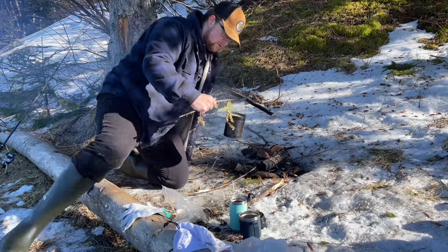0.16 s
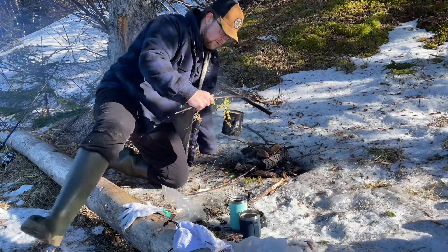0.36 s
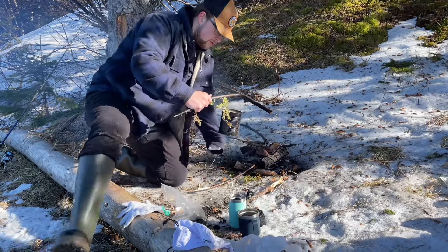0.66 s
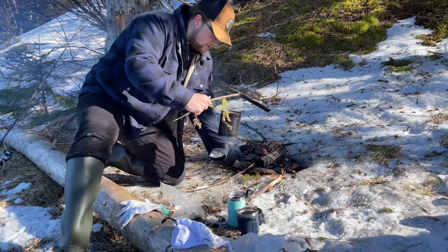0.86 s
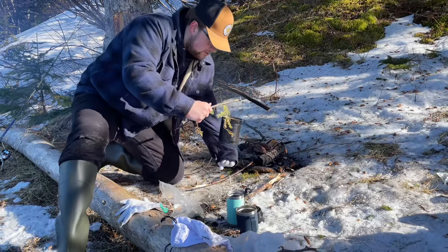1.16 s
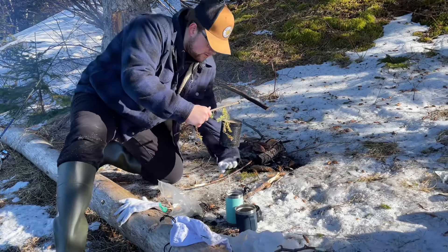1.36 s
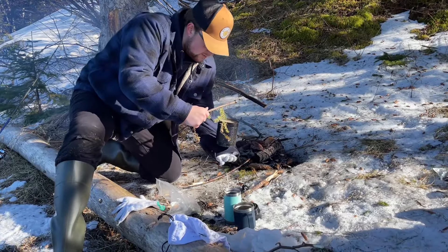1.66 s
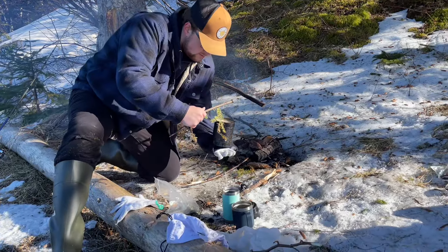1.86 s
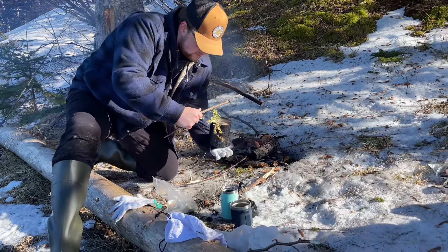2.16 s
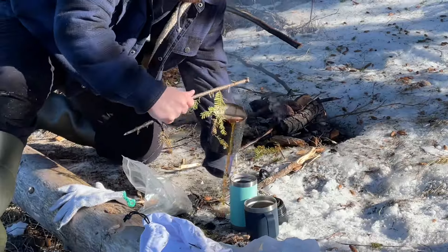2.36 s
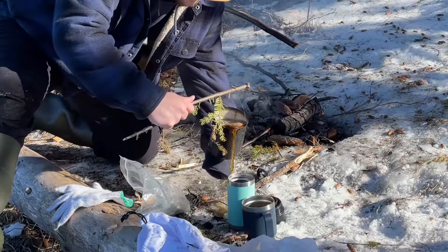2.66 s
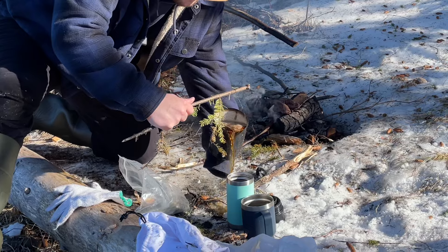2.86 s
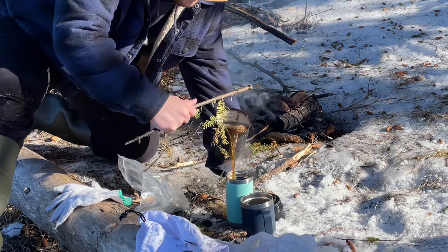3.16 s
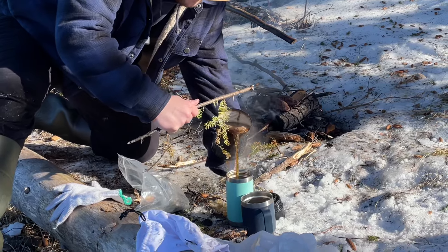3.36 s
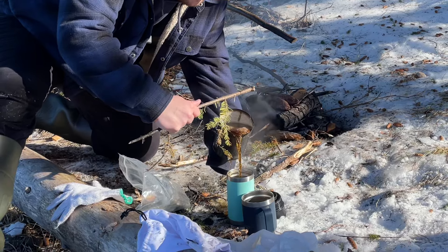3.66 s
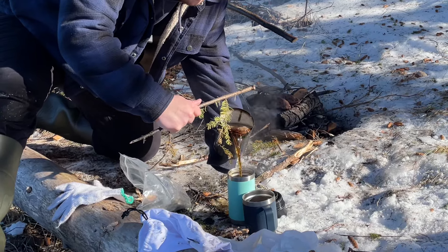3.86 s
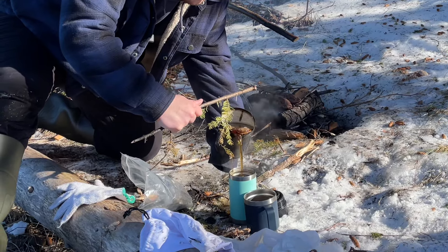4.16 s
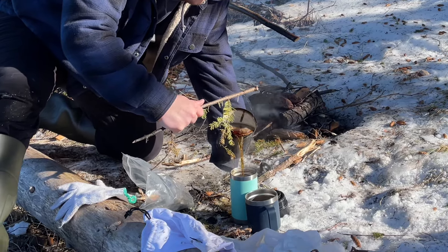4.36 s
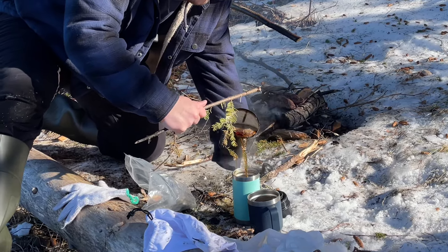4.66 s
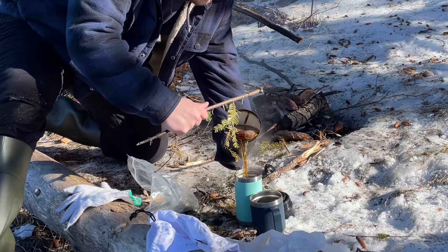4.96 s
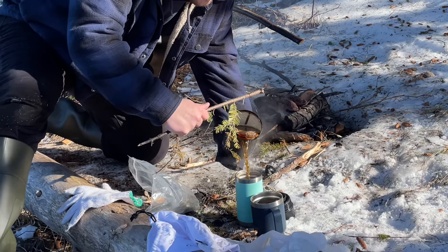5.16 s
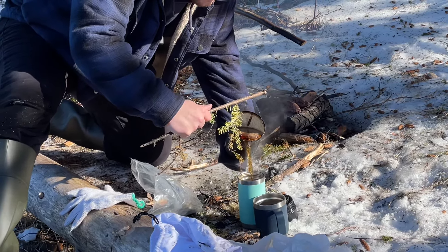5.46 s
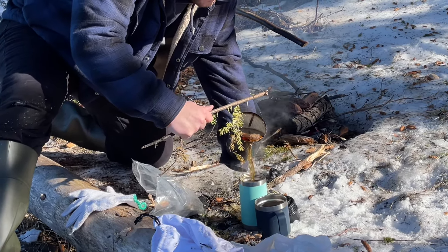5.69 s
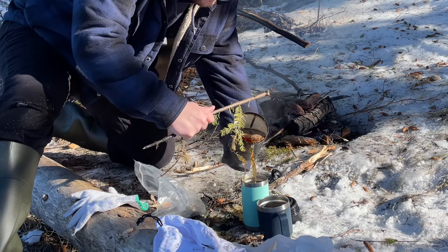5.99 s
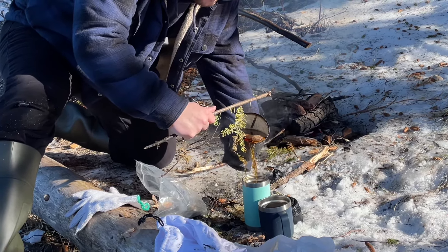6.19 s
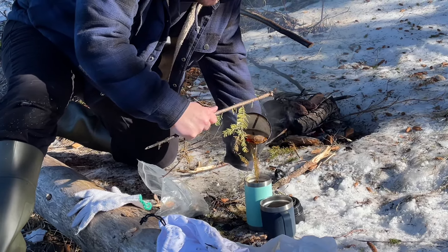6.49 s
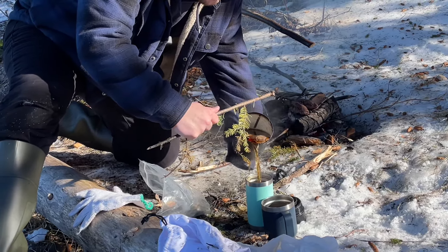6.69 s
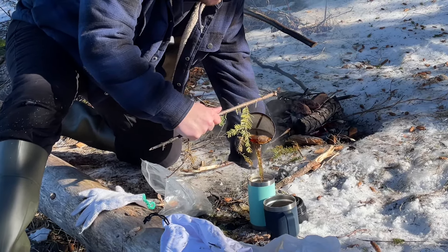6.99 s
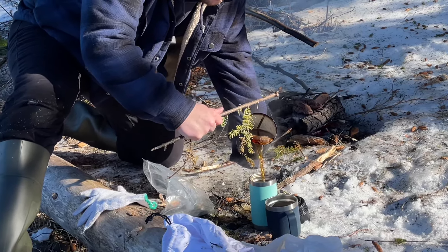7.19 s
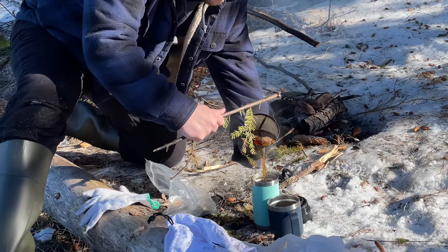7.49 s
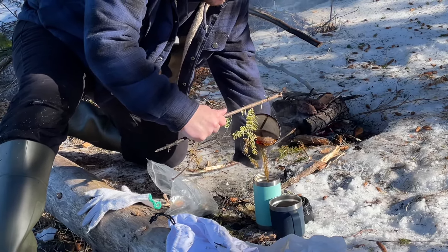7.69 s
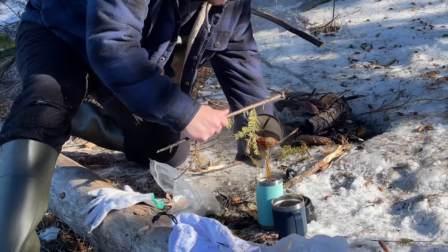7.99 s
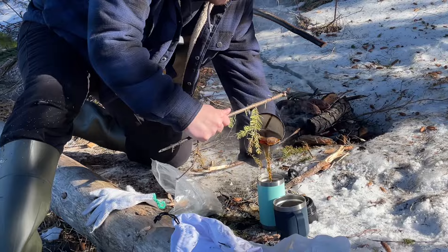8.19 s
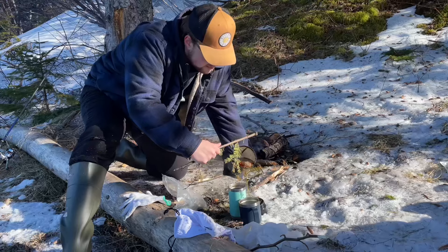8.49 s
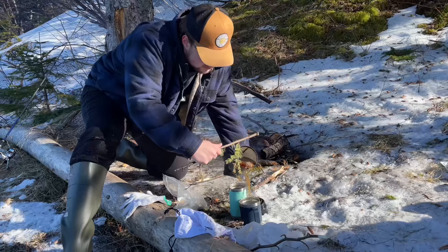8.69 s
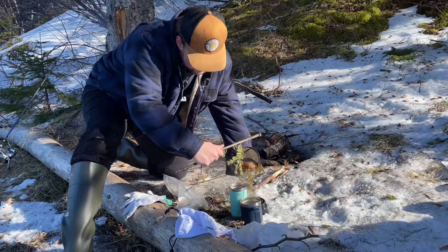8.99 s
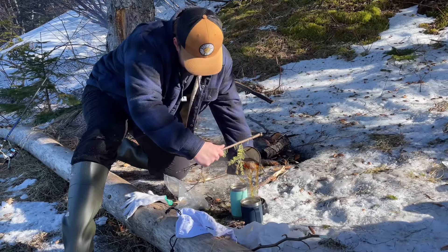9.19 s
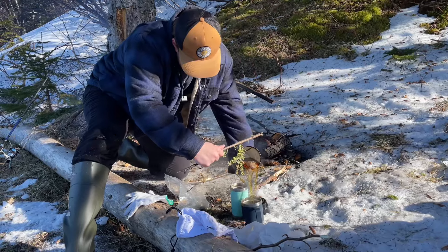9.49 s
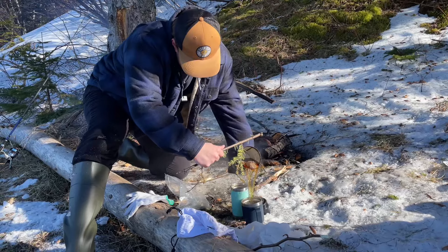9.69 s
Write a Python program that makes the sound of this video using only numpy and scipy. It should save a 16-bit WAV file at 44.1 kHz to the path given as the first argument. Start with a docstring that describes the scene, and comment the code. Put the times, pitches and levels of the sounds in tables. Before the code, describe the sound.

Boots thump and clothing rustles, embers pop sharply, then a thin stream of tea gurgles into a steel mug outdoors, pausing before resuming.

```python
"""In a snowy wood, beside a dying campfire, tea trickles from a can into a steel mug.
Behind it lie a far rumble and a thin hiss of filtered noise, and a frequency-modulated drone.
A kneeling man shifts his boots (noise bursts and decaying thumps); embers pop (band-passed pushes).
The first tea rings the mug's modes, then the stream plops in its air column, a resonator whose
note rises through the first pour. Near the end a second pour begins, its note sinking slightly."""
import sys
import numpy as np
from scipy import signal
from scipy.fft import rfft, irfft, next_fast_len
from scipy.io import wavfile
from scipy.ndimage import map_coordinates

SR = 44100
rng = np.random.default_rng(int(sys.argv[2]) if len(sys.argv) > 2 else 0)


def to_wav(s):
    """Save 16-bit WAV."""
    ch = np.atleast_2d(s).T  # columns
    pcm = np.round(np.clip(ch, -1, 1) * 32767)  # PCM
    wavfile.write(sys.argv[1], SR, pcm.astype(np.int16))


N = 433944


def amp(db):
    """Decibel scale: a level becomes an amplitude gain."""
    return 10 ** (np.asarray(db) / 20)


def unit(x):
    """Normalisation: x is scaled to an rms value of 1."""
    return x / np.sqrt(np.mean(x ** 2) + 1e-20)


def fade(t, t60):
    """Exponential decay: the amplitude falls by 60 dB in t60 seconds."""
    return np.exp(-np.log(1000) * t / t60)


def swell(s, width):
    """Gaussian envelope: height 1 at time s, 1/e at a distance of width seconds."""
    return np.exp(-((np.arange(N) / SR - s) / width) ** 2)


def along(points, hz):
    """Interpolation of (Hz, value) points on a logarithmic frequency axis."""
    f, v = np.transpose(points)
    return np.interp(np.log(hz + 1), np.log(f + 1), v)


def curves(rows):
    """Linear interpolation in time: one value per sample for each column after the time."""
    s, *cols = np.transpose(rows)
    return [np.interp(np.arange(N) / SR, s, c) for c in cols]


def held(rows):
    """Step function: one value per sample for each column, from the row that began last."""
    rows = np.array(rows)
    return rows[np.searchsorted(rows[1:, 0], np.arange(N) / SR)].T


def wobble(rate):
    """Slow random modulation: a spline through random knots, rate of them a second."""
    knots = rng.standard_normal(int(N * rate / SR) + 4)
    return map_coordinates(knots, [np.arange(N) * rate / SR])


def filtered(x, response):
    """Linear filtering: the spectrum of x is multiplied by a frequency response."""
    m = next_fast_len(N + SR // 2)
    return irfft(rfft(x, m) * response(np.fft.rfftfreq(m, 1 / SR)), m)[..., :N]


def coloured(x, spectrum):
    """Spectral shaping: x is given a (Hz, dB) weighting and an rms value of 1."""
    return unit(filtered(x, lambda hz: amp(along(spectrum, hz))))


def band(x, lo_hz, hi_hz, order=2):
    """Causal Butterworth band-pass filtering."""
    edges_hz = [lo_hz, min(hi_hz, SR / 2 - 1)]
    return signal.sosfilt(signal.butter(order, edges_hz, "band", fs=SR, output="sos"), x)


def add(track, s, x):
    """Superposition: x is summed into the track from time s."""
    part = track[max(round(s * SR), 0):][:len(x)]
    part += x[:len(part)]


def stereo_noise(side_db):
    """Partial coherence: two noises share a mid part and differ by a side part."""
    mid, side = rng.standard_normal((2, N))
    return np.array([mid + amp(side_db) * side, mid - amp(side_db) * side])


def ticks(rate, scatter_db):
    """Random impulse train: rate impulses a second, their sizes spread over scatter_db."""
    draws = rng.random((int(rate * N / SR), 2))
    return np.bincount((draws[:, 0] * N).astype(int), amp(-scatter_db * draws[:, 1]), N)


def bursts(blows, t60):
    """Envelope modulation: each blow becomes a decaying puff of noise."""
    envelope = signal.lfilter([1], [1, -fade(1 / SR, t60)], blows)
    return unit(envelope * rng.standard_normal(N))


def resonator(x, hz, t60):
    """Resonance: x rings one damped mode, whose frequency may move."""
    turn = np.exp(2j * np.pi * np.cumsum(hz * np.ones(N)) / SR)
    ringing = turn * signal.lfilter([1], [1, -fade(1 / SR, t60)], x / turn)
    return unit(ringing.imag)


def bubble(hz, t60, rise, attack):
    """Bubble resonance: a pocket of air rings, its pitch climbing as it nears the surface."""
    t = np.arange(SR // 16) / SR
    return np.sin(2 * np.pi * hz * t * (1 + rise * t)) * fade(t, t60) * (1 - np.exp(-t / attack))


def bubbles(blows, pitch, spread, t60, rise):
    """Bubble population: each blow rings near a pitch curve, with its own life and chirp."""
    out = np.zeros(N)
    at = np.flatnonzero(blows)
    draws = np.clip(rng.standard_normal((len(at), 4)), -2, 2)
    for i, (detune, sign, life, climb) in zip(at, draws):
        hz = pitch[i] * np.exp(spread * detune)
        ring = bubble(hz, t60 * np.exp(0.58 * life), rise * np.exp(0.9 * climb), attack=0.00047)
        add(out, i / SR, np.sign(sign) * blows[i] * ring)
    return unit(out)


# The background in three stretches. Each row: start in seconds, hiss level in dB before a 9.5 dB lift,
# echo of pops, thumps and knocks in dB.
BACKGROUND = [(0, -75, -10), (2.321, -73.5, -19.5), (8.394, -69.5, -14)]
# Spectrum of the far rumble. Each row: frequency in Hz, relative level in dB.
RUMBLE_SPECTRUM = [(20, -49), (45, -1.5), (72, 4), (150, -2), (215, -6), (310, -17), (700, -19.5),
                   (1500, -31), (4000, -46)]
# Spectrum of the thin hiss. Each row: frequency in Hz, relative level in dB.
HISS_SPECTRUM = [(300, 6), (1500, 1.5), (4000, 3), (7000, 0.5), (12000, -2), (16000, 1.5)]
# Glide of the far drone. Each row: time in seconds, mean pitch in Hz.
DRONE = [(2.3, 107), (2.5, 140.3), (3.8, 154.2), (4.95, 160.6), (5.4, 120), (9.84, 122)]
RUMBLE_DB = -57
DRONE_DB, DRONE_IDLE_HZ, DRONE_DB_PER_OCT = -63.5, 120, 6.5  # it grows louder as it rises


def air():
    """Filtered noise and frequency modulation: a far rumble, a wavering drone and a thin hiss."""
    _, hiss_db, _ = held(BACKGROUND)
    drone_hz, = curves(DRONE)
    drone_db = DRONE_DB + DRONE_DB_PER_OCT * np.log2(drone_hz / DRONE_IDLE_HZ)
    rumble = coloured(stereo_noise(side_db=-7.5), RUMBLE_SPECTRUM) * amp(1.3 * wobble(12))
    phase = 2 * np.pi * np.cumsum(drone_hz + 1.6 * wobble(20)) / SR
    drone = unit(np.sin(phase) * amp(1.5 * wobble(8.7)))
    hiss = coloured(stereo_noise(side_db=0.0), HISS_SPECTRUM) * amp(0.7 * wobble(5))
    return amp(RUMBLE_DB) * rumble + amp(drone_db) * drone + amp(hiss_db + 9.5) * hiss


# Echo among the trees. Each row: frequency in Hz, 60 dB decay time in seconds.
WOOD_DECAY = [(200, 0.18), (2000, 0.15), (6000, 0.15), (14000, 0.15)]


def trees(x):
    """Diffuse scattering: trunks return a late, decaying noise tail, different on each side."""
    hz, t, z = signal.stft(rng.standard_normal((2, SR // 3)), SR, nperseg=256)
    decay = fade(t, along(WOOD_DECAY, hz)[:, None])
    tail = signal.istft(z * decay, SR, nperseg=256)[1]
    late = np.pad(x, (round(.011 * SR), 0))  # 11 ms on the way
    return signal.fftconvolve(late[None], tail / np.linalg.norm(tail[0]), axes=1)[:, :N]


# Swells of rustling; the one at 3.2 s is the wash after a loud pop. Each row: middle in seconds, half
# width in seconds, cloth level in dB before a 3.5 dB lift, snow level in dB before a 4 dB lift.
RUSTLES = [(0.17, 0.053, -59, -61), (0.73, 0.049, -64, -70), (1.0, 0.26, -59.5, -74),
           (1.401, 0.23, -64, -63.5), (2.205, 0.019, -75, -64), (2.4, 0.089, -68, -65),
           (2.8, 0.45, -71, -64), (3.2, 0.13, -63, -66.5)]
# Spectrum of the jacket. Each row: frequency in Hz, relative level in dB.
CLOTH_SPECTRUM = [(150, -8), (400, 2), (800, -2), (1200, 1), (1950, -5.5), (2400, -11), (6000, -22)]
# Spectrum of the snow. Each row: frequency in Hz, relative level in dB.
SNOW_SPECTRUM = [(800, -38), (2500, 0.5), (4200, 3.5), (7000, 2.5), (12000, -1), (16000, -4.5)]


def rustle():
    """Granular friction noise: swells of tiny slips and cracks, one of them the wash after a pop."""
    slips = bursts(ticks(rate=260, scatter_db=24), t60=0.0097)
    rub = stereo_noise(side_db=1.5) * amp(1.85 * wobble(60))
    cloth = coloured(0.67 * rub + 0.8 * slips, CLOTH_SPECTRUM)
    cracks = bursts(ticks(rate=120, scatter_db=27), t60=0.0094)
    snow = coloured(stereo_noise(side_db=1.5) + 1.34 * cracks, SNOW_SPECTRUM)
    out = np.zeros((2, N))
    for s, width, cloth_db, snow_db in RUSTLES:
        out += swell(s, width) * (amp(cloth_db + 3.5) * cloth + amp(snow_db + 4.0) * snow)
    return out


# Boot thumps on crusted ground, and two dull knocks of the can or a stick (3.244, 3.54). Each row:
# time in seconds, blow level in dB, grit in dB re the blow before a 0.5 dB cut, pitch of the first
# touch in Hz, pitch of the second in Hz, t60 in seconds.
THUMPS = [(0.19, -46, -5, 172.4, 169, 0.056), (0.5381, -22, -21, 261, 115, 0.037),
          (0.9428, -31.5, -9.5, 345, 154, 0.058), (3.012, -33.5, -24, 244, 173, 0.036),
          (3.244, -27.5, -15.5, 950, 800, 0.0095), (3.54, -34, -14.5, 650, 401, 0.0083)]
SECOND_S, SECOND_DB = .012, -3.5  # a second touch follows the first: later and softer


def thumps_and_knocks():
    """Impact: a damped tone with scuff and grit, struck twice, for boot thumps and dull knocks."""
    out, t = np.zeros(N), np.arange(SR // 6) / SR
    for s, db, grit_db, first_hz, second_hz, t60 in THUMPS:
        for late, hz in enumerate([first_hz, second_hz]):
            thump = np.sin(2 * np.pi * hz * t) * fade(t, t60) * (1 - np.exp(-t * hz / 0.24))
            scuff = unit(band(rng.standard_normal(len(t)), 420, 1430, order=3)) * fade(t, 0.027)
            # cubed noise is spiky, hence gritty
            grit = unit(band(rng.standard_normal(len(t)) ** 3, 3000, 8400)) * fade(t, 0.037)
            blow = amp(1.0) * thump + amp(-9.5) * scuff + amp(grit_db - 0.5) * grit
            add(out, s + late * SECOND_S, amp(db + late * SECOND_DB) * blow)
    return out


# Wood snapping in the embers and underfoot. Each row: time in seconds (sounded 0.97 ms later),
# crack peak in dB, fizz in dB re the crack before a 1 dB cut, splintering in dB before it is scaled
# up for weak pops and down for strong ones, crack centre in Hz.
SNAPS = [(0.135, -45, -27, 2, 3000), (0.5352, -31, -23, 5, 4290), (0.548, -35, -27, -8, 4200),
         (0.554, -31.5, -28, -3, 4120), (0.578, -39, -27, -13, 4270), (0.6662, -45.5, -19, -10, 4400),
         (0.6993, -37, -28, 4, 3670), (1.3806, -40, -15.5, -4, 5500), (1.6295, -41, -15, 1, 4620),
         (1.749, -36.5, -13, 17, 3540), (1.9247, -41, -18.5, -4, 4000), (1.9797, -33, -28, -20.5, 4690),
         (2.1762, -25.5, -19, -10, 3580), (2.357, -37.5, -21, -5, 4350), (2.4734, -32.5, -12, -10, 4500),
         (2.5716, -37, -19.5, -3, 5970), (3.1273, -37.5, -13.5, -7.5, 4160),
         (3.1986, -4.5, -31, -9.5, 4350), (3.709, -32.5, -10.5, 1, 3350), (3.8362, -31, -21, -21, 3390),
         (4.3675, -20.5, -24.5, -11, 4000), (4.489, -29.5, -22, -22.5, 5470), (4.564, -27, -14, 14, 3780),
         (5.033, -7, -39.5, -9.5, 3830), (5.3909, -32.5, -25, 8, 3650), (5.712, -35, -23.5, -23, 3780),
         (5.9237, -32.5, -16, -1, 6000), (6.3088, -33, -19.5, -15, 3380), (6.424, -40.5, -18, -14, 3300),
         (7.4256, -41, -25, -7, 2760), (8.4822, -25.5, -14, -27, 5500), (8.6517, -8.5, -25, -16.5, 2990),
         (8.7687, -29, -14.5, -29, 4400), (9.603, -38.5, -9, -17, 3250)]
TYPICAL_POP_DB, TYPICAL_POP_HZ = -35.5, 4000  # the crack against which the others are sized
POP_BODY_DB, BODY_DB_PER_OCT, BODY_PER_DB = -27, -16.5, -0.12  # low and weak cracks have more body


def embers():
    """Brittle fracture: wood gives one sharp push, then a few milliseconds of splintering."""
    out, t = np.zeros(N), np.arange(SR // 40) / SR
    for s, db, fizz_db, splinter_db, hz in SNAPS:
        body_db = POP_BODY_DB + BODY_DB_PER_OCT * np.log2(hz / TYPICAL_POP_HZ)
        body_db += BODY_PER_DB * (db - TYPICAL_POP_DB)
        weak = np.clip(-db / 22, .3, 1.6)  # strong pops are the cleanest
        splinters = weak * amp(splinter_db) * rng.standard_normal(len(t)) * fade(t, 0.013)
        burst = (t == 0) + splinters
        crack = band(burst, hz / 1.39, hz * 1.54, order=3)
        body = amp(body_db) * unit(band(burst, 660, 2110) + 0.74 * band(burst, 110, 360))
        fizz = amp(fizz_db - 1) * unit(band(burst, 7600, 17400))
        add(out, s + 0.00097, amp(db) * (crack / np.abs(crack).max() + body + fizz))
    return out


# Modes of the empty mug. Each row: frequency in Hz, relative level in dB, t60 in seconds.
EMPTY_MUG = [(1700, -12, 0.12), (1867, 0.5, 0.21), (2800, -9.5, 0.071), (3240, -12, 0.059),
             (3850, -10, .08), (4326, -6, 0.067)]
FIRST_TEA_S, FIRST_TEA_DB = 3.095, -42  # time and level of the swell's top
FIRST_RISE_S, FIRST_T60_S = 0.076, 0.097  # its 60 dB rise and fall


def first_tea():
    """Modal resonance: the first dribble sets the empty mug singing for a moment."""
    t = np.arange(N) / SR - FIRST_TEA_S
    shape = fade(np.maximum(-t, 0), FIRST_RISE_S) * fade(np.maximum(t, 0), FIRST_T60_S)
    patter = ticks(rate=400, scatter_db=6)
    ring = sum(amp(db) * resonator(patter, hz, t60) for hz, db, t60 in EMPTY_MUG)
    return amp(FIRST_TEA_DB) * shape * unit(ring)


MUFFLE_RATIO = 1.25  # tea muffles the bottom's modes above this multiple of its pitch


def muffle(ratio):
    """Low-pass damping: the gain of a bottom mode under tea."""
    return 1 / np.sqrt(1 + (ratio / MUFFLE_RATIO) ** 10)


# Modes of the mug's bottom. Each row: ratio to its pitch, relative level in dB before muffling.
BOTTOM_MODES = [(.6, -11), (.81, -5), (0.998, 6), (1.24, 5), (1.67, 10), (2.379, 3)]
SINK_OCT_PER_S, COVER_DB_PER_S = 0.384, 27  # tea loads and damps the bottom


def shallows():
    """Mass loading: patter rings the bottom's modes, which sink and fade as tea covers it."""
    start, *_, first_db, first_hz = held(POUR_ROWS)
    age = np.maximum(np.arange(N) / SR - start, 0)
    pitch = first_hz * 2 ** (-SINK_OCT_PER_S * age)
    patter = bursts(ticks(rate=110, scatter_db=23.0), t60=0.0094)
    ring = np.zeros(N)
    for ratio, level in BOTTOM_MODES:
        slosh = 1 + 0.019 * wobble(30)  # moving tea loads each mode in its own way
        ring += amp(level) * muffle(ratio) * resonator(patter, ratio * pitch * slosh, t60=.05)
    return np.clip(age / OPEN_S, 0, 1) * amp(first_db - COVER_DB_PER_S * age) * unit(ring)


# Tinkles as the tea lands, probably bubbles on its surface. Each row: time in seconds, level in dB
# before a 4 dB cut, strongest starting pitch in Hz, second in Hz, third in Hz.
TINKLES = [(3.414, -47, 1353, 1950, 3420), (3.709, -41.5, 1256, 2830, 3400),
           (8.583, -49.5, 4170, 3260, 4850), (8.623, -49.5, 2670, 3300, 4200),
           (8.683, -43, 2620, 3330, 4400), (8.803, -49, 1900, 2550, 5580), (8.844, -43.5, 3330, 2700, 4060),
           (8.875, -51, 1790, 3250, 5520), (8.977, -45.5, 4060, 3020, 5480),
           (9.02, -48.5, 3910, 5000, 3180), (9.061, -41, 3030, 4140, 4980), (9.184, -44, 3280, 5400, 2610),
           (9.21, -51, 4530, 5550, 3550), (9.228, -48, 3200, 2550, 3470)]
# Levels of the three pitches in dB, strongest first.
TINKLE_LEVELS = [1.5, -3.5, -4]
TINKLE_T60_S, TINKLE_SINK_PER_S = 0.1, 0.33  # decay, and the share the pitches sink by each second


def tinkles():
    """Damped oscillation: three sinking pitches and a slap, probably bubbles on the tea's surface."""
    out, t = np.zeros(N), np.arange(SR // 5) / SR
    sinking_t = t * (1 - TINKLE_SINK_PER_S * t / 2)
    for s, db, *pitches_hz in TINKLES:
        ring = sum(amp(level) * np.sin(2 * np.pi * hz * sinking_t)
                   for hz, level in zip(pitches_hz, TINKLE_LEVELS))
        slap = band(rng.standard_normal(len(t)), 3100, 5800) * fade(t, 0.06)
        tinkle = (ring * fade(t, TINKLE_T60_S) + amp(11.0) * slap) * (1 - np.exp(-t / 0.00091))
        add(out, s, amp(db - 4) * tinkle)
    return out


# Small bubbles that stand out. Each row: time in seconds, level in dB before a 3 dB cut,
# starting pitch in Hz.
SMALL_BUBBLES = [(3.8852, -38.5, 2900), (4.1458, -39.5, 3240), (4.1828, -36, 3290), (4.735, -43, 2120),
                 (4.8136, -44.5, 6100), (5.2665, -41, 2130), (6.165, -40.5, 3500), (6.4097, -40.5, 3370),
                 (6.7589, -42, 2230), (7.058, -43.5, 2790), (7.2188, -40, 2230), (7.4757, -39.5, 2100),
                 (8.064, -44, 2020), (8.1366, -39.5, 2090), (9.361, -30.5, 3380), (9.4717, -35.5, 6050),
                 (9.7476, -28.5, 3400)]


def blips():
    """Bubble pinch-off: a small bubble gives a wet tick and a short upward chirp."""
    out = np.zeros(N)
    for s, db, hz in SMALL_BUBBLES:
        chirp = bubble(hz, t60=0.011, rise=2.3, attack=0.00027)
        tick = band(rng.standard_normal(len(chirp)), hz / 1.5, hz * 1.4)
        tick *= fade(np.arange(len(chirp)) / SR, 0.02)
        add(out, s, amp(db - 3.0) * (chirp + amp(4.5) * tick))
    return out


# The loudest gulps of air. Each row: time in seconds, nominal level in dB, starting bubble pitch in Hz.
LOUD_GULPS = [(4.559, -38, 700), (4.696, -44, 678), (4.756, -37.5, 713), (4.799, -40.5, 721),
              (4.822, -37.5, 712), (4.989, -42, 751), (5.208, -41.5, 751), (5.267, -40, 780),
              (5.307, -40.5, 770), (5.392, -37, 775), (5.494, -44, 791), (5.824, -41, 767),
              (5.927, -39.5, 807), (6.067, -40, 805), (6.301, -38.5, 790), (6.41, -39, 1010),
              (6.646, -40, 775), (6.736, -44.5, 770), (6.857, -39, 750), (7.067, -39.5, 780),
              (7.122, -37.5, 724), (7.252, -45, 940), (7.404, -36, 895), (7.776, -40.5, 965),
              (7.814, -40.5, 960), (7.951, -40, 990), (7.977, -42.5, 977), (8.224, -45.5, 974),
              (9.154, -39, 960), (9.273, -39, 990), (9.318, -40.5, 950), (9.441, -38.5, 920),
              (9.525, -34.5, 950), (9.565, -39, 945), (9.598, -41, 961), (9.71, -36, 925),
              (9.784, -37, 982)]
COLUMN_T60_S = 0.045  # how long the air column rings
OVERTONE_DB, OVERTONE_T60_S = -8.5, 0.042  # the mug's hollow second note, against the air column


def gulps(note, overtone_hz):
    """Cavity resonance: a large bubble smacks and knocks, and the mug's two notes ring on."""
    out, t = np.zeros(N), np.arange(SR // 16) / SR
    for s, db, hz in LOUD_GULPS:
        i = round(s * SR)
        smack = unit(band(rng.standard_normal(len(t)), 300, 2700, order=1)) * fade(t, 0.015)
        ring = np.sin(2 * np.pi * note[i] * t) * fade(t, COLUMN_T60_S)
        overtone = np.sin(2 * np.pi * overtone_hz[i] * t) * fade(t, OVERTONE_T60_S)
        ring += amp(OVERTONE_DB) * overtone
        knock = bubble(hz, t60=0.017, rise=0.3, attack=0.0009)
        add(out, s, amp(db) * (amp(3.0) * knock + amp(-8.5) * ring + amp(-14.5) * smack))
    return out


# Each pour starts as a dribble, then runs full. Each row: start in seconds, full stream in seconds, end
# in seconds, nominal plop level in dB, nominal splash level in dB, mug's second note in Hz, bottom's
# first ring level in dB, bottom's first pitch in Hz.
POUR_ROWS = [(3.3, 3.42, 8.39, -57.5, -61, 988, -59, 1497),
             (8.66, 9.155, 9.9, -47.5, -55, 1217, -56.5, 3390)]
# The stream thins or swells as the can tilts. Each row: middle in seconds, half width in seconds,
# change in dB.
CAN_TILTS = [(3.48, 0.11, 3.5), (4.0, 0.12, -7), (5.9, .7, 1.6), (8.25, 0.2, -5)]
# Note of the air column, rising through the first pour, sinking slightly in the second. Each row:
# time in seconds, pitch in Hz.
COLUMN_NOTE = [(3.3, 620), (4.1, 650), (4.5, 700), (5.1, 713), (5.5, 775), (6.85, 807), (7.5, 943),
               (8.39, 1010), (9.15, 955), (9.84, 929)]
OPEN_S, GUSH_S, STOP_S = 0.1, 0.067, 0.009  # the stream starts, turns full and breaks off
DRIBBLE_SPLASH_DB, DRIBBLE_PLOP_DB = -3.5, -14  # a dribble against the full stream
SHALLOW_PLOP_DB, DEEPEN_S = -8.5, 0.38  # plops are weak until the tea has some depth
CUSHION_DB_PER_S = 0.81  # deeper tea softens the splash
SURGE_DB, SURGE_RATE = 2.05, 14  # the flow is uneven: depth, random knots a second


def stream():
    """Amplitude control by flow: gains of plops and splash, and the note of the air column."""
    t = np.arange(N) / SR
    start, full, end, plop_db, splash_db, *_ = held(POUR_ROWS)
    age, full_age = np.maximum(t - start, 0), np.maximum(t - full, 0)
    running = np.clip(age / OPEN_S, 0, 1) * np.clip((end - t) / STOP_S, 0, 1)
    dribble = np.clip((full - t) / GUSH_S, 0, 1)
    tilt_db = sum(db * swell(s, width) for s, width, db in CAN_TILTS)
    flow = running * amp(tilt_db + SURGE_DB * wobble(SURGE_RATE))
    shallow_db = SHALLOW_PLOP_DB * np.exp(-full_age / DEEPEN_S)
    plop = amp(plop_db + DRIBBLE_PLOP_DB * dribble + shallow_db)
    splash = amp(splash_db + DRIBBLE_SPLASH_DB * dribble - CUSHION_DB_PER_S * full_age)
    return flow * plop, flow * splash, curves(COLUMN_NOTE)[0]


# Spectrum of the splash. Each row: frequency in Hz, relative level in dB.
SPLASH_SPECTRUM = [(300, -22), (1000, -2), (1450, -12), (2050, 0.5), (2400, -21), (2800, 2), (5000, -6.5),
                   (6000, 1), (7200, -2), (11000, -1.5), (16000, -15)]
# Modes of the mug's walls. Each row: mean frequency in Hz, relative level in dB, t60 in seconds.
WALL_MODES = [(2100, 1, 0.018), (2790, -3, 0.023), (3420, 0.5, 0.021), (4200, -1.5, 0.013),
              (5630, -4.5, 0.011)]
ROOM_FOR_BUBBLES_S = 0.43  # free bubbles need some depth of tea


def pour():
    """Jet break-up: blobs of tea thud, ring the mug, drag down air and throw droplets."""
    plop, splash, note = stream()
    _, full, _, _, _, overtone_hz, _, _ = held(POUR_ROWS)
    depth = 1 - np.exp(-np.maximum(np.arange(N) / SR - full, 0) / ROOM_FOR_BUBBLES_S)
    blobs = ticks(rate=150, scatter_db=20.5)
    column = resonator(blobs, note * (1 + 0.039 * wobble(25)), COLUMN_T60_S)
    overtone = resonator(blobs, overtone_hz * (1 + 0.026 * wobble(25)), OVERTONE_T60_S)
    thud = unit(band(blobs, 230, 386)) * (note[0] / note) ** 4  # weaker when the note is high
    pockets = bubbles(blobs, np.full(N, 640), spread=0.16, t60=0.011, rise=0.3)
    droplets = ticks(rate=180, scatter_db=40) + 0.52 * blobs ** 2
    spray = bursts(droplets, t60=0.004) + 0.57 * bursts(blobs, t60=0.027)
    spray = coloured(spray, SPLASH_SPECTRUM)
    walls = np.zeros(N)
    for hz, db, t60 in WALL_MODES:
        hits = droplets * rng.standard_normal(N)
        walls += amp(db) * resonator(hits, hz * (1 + 0.023 * wobble(10)), t60)
    walls = unit(walls)
    specks = ticks(rate=240, scatter_db=38)
    fine = bubbles(specks, np.full(N, 3800), spread=0.52, t60=0.006, rise=1.5)
    # low gulps of air, then the bright splash with its ringing walls and tiny bubbles
    low = amp(-2.5) * (column + amp(OVERTONE_DB) * overtone)
    low += amp(-11.5) * thud + amp(-8.0) * depth * pockets
    bright = amp(-4.5) * spray + amp(-3.0) * walls + amp(-7.0) * depth * fine
    tea = plop * low + splash * amp(0.78 * wobble(20)) * bright
    return tea + gulps(note, overtone_hz)


# Phase between the two microphone ports. Each row: frequency in Hz, lead of the left in radians.
PORT_LEAD = [(100, .1), (900, 0.75), (2000, 0.49), (4000, 0.78), (6000, 1.14), (10000, 1.34), (15000, 0.9)]
TEA_ECHO_DB = -11  # what the trees send back of the pour


def scene():
    """Inter-channel phase difference: near sounds reach two ports slightly out of step."""
    tea = first_tea() + pour() + blips() + shallows() + tinkles()
    fire = embers() + thumps_and_knocks()
    sides = np.array([[1], [-1]])
    near = filtered(tea + fire, lambda hz: np.exp(.5j * along(PORT_LEAD, hz) * sides))
    *_, echo_db = held(BACKGROUND)
    echo = trees(amp(TEA_ECHO_DB) * tea + amp(echo_db) * fire)
    return near * amp([[.4], [-.4]]) + echo + rustle() + air()


# Colour of the microphone. Each row: frequency in Hz, gain in dB.
MIC_RESPONSE = [(6600, -1), (7500, -3.5), (8400, -10), (10300, 1.5), (13000, -3), (14500, -10.5),
                (16000, -29)]
TOP_HZ = 16500  # band limit
DIP_DB, DIP_WIDTH_S = -21, 0.019  # the level dips briefly between stretches


def record(dry):
    """Linear transduction: two brief level dips, the microphone's colour and its band limit."""
    dip_db = sum(DIP_DB * swell(s, DIP_WIDTH_S) for s, *_ in BACKGROUND[1:])
    return filtered(dry * amp(dip_db), lambda hz: amp(along(MIC_RESPONSE, hz)) * (hz < TOP_HZ))


dry = scene()
out = record(dry)
to_wav(out)
```